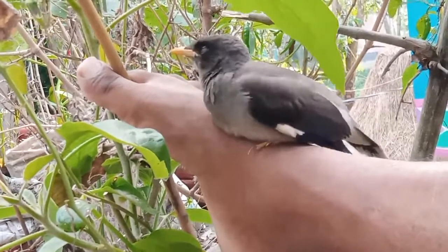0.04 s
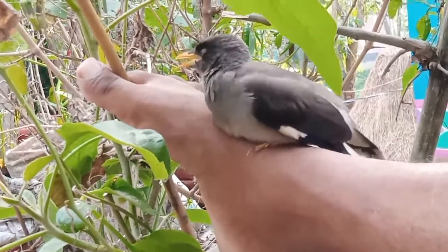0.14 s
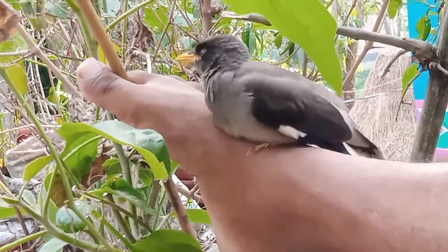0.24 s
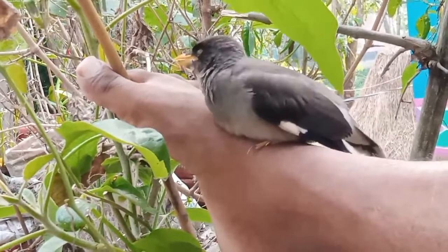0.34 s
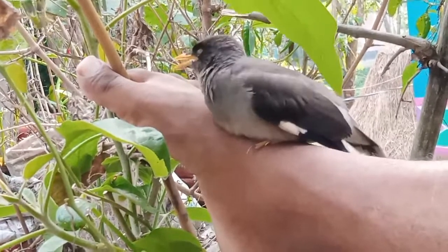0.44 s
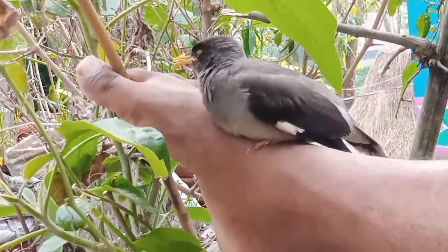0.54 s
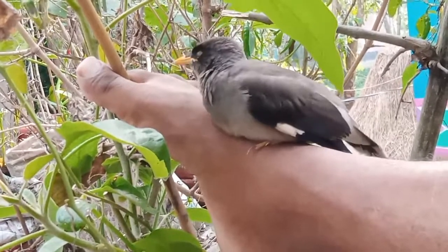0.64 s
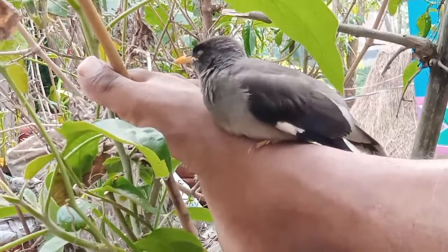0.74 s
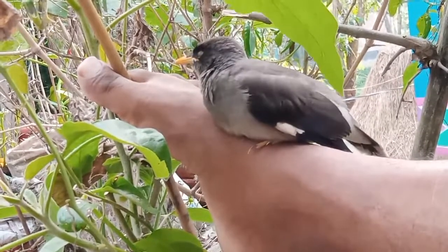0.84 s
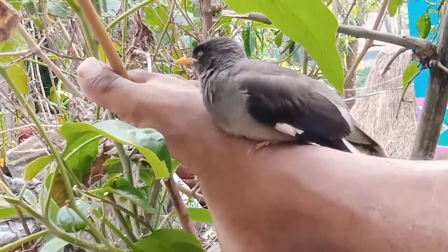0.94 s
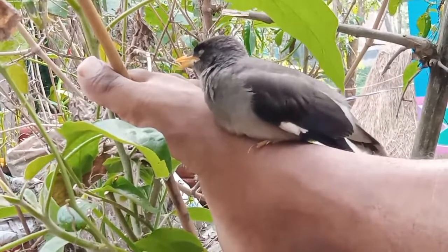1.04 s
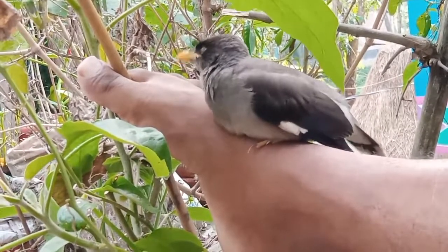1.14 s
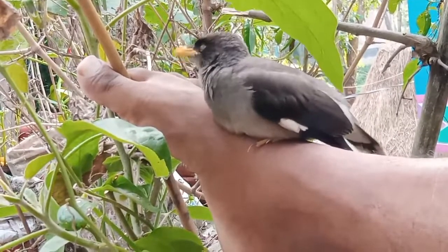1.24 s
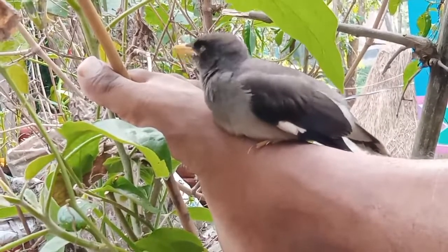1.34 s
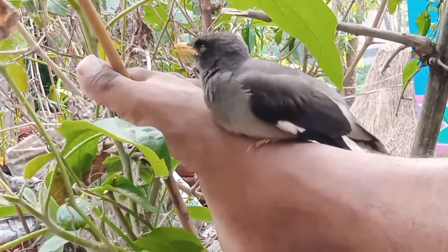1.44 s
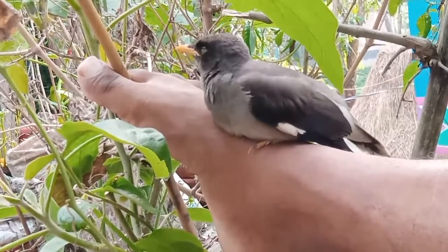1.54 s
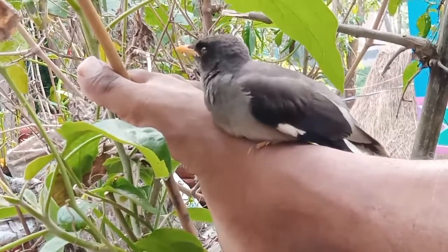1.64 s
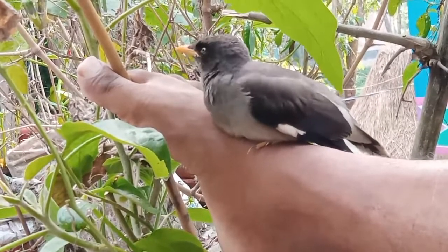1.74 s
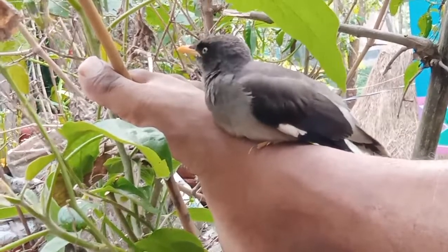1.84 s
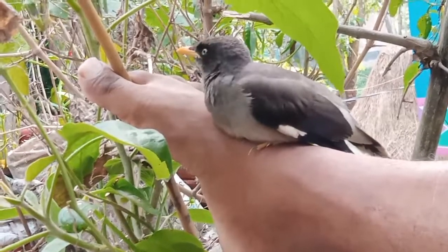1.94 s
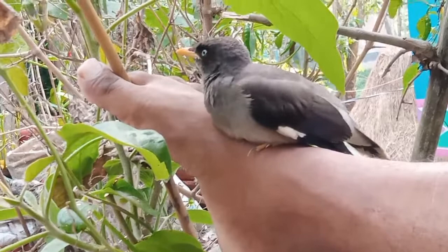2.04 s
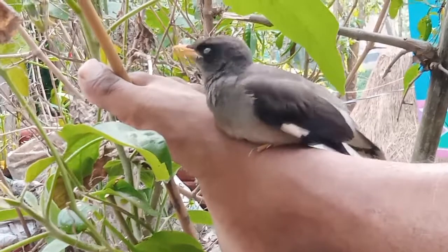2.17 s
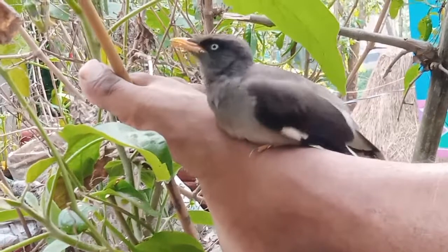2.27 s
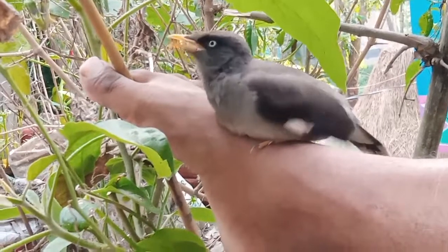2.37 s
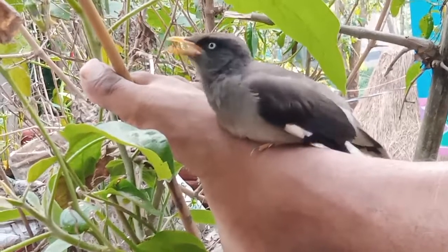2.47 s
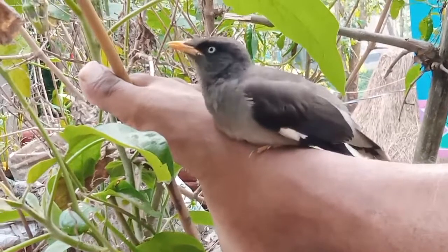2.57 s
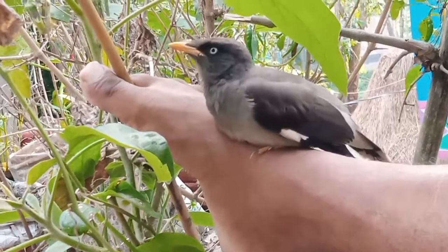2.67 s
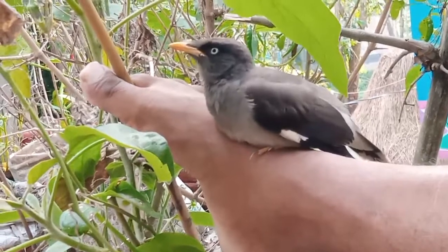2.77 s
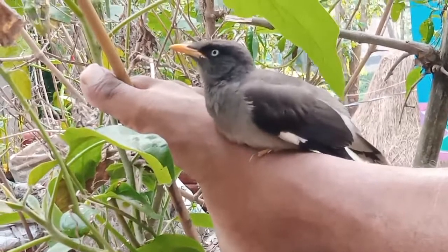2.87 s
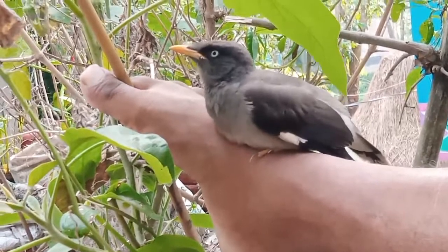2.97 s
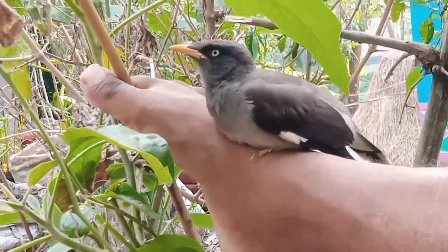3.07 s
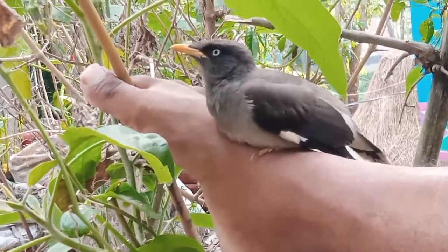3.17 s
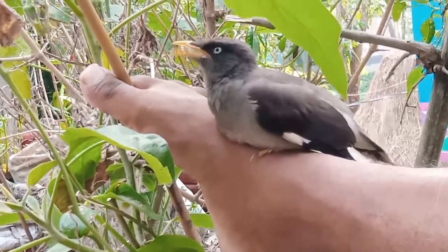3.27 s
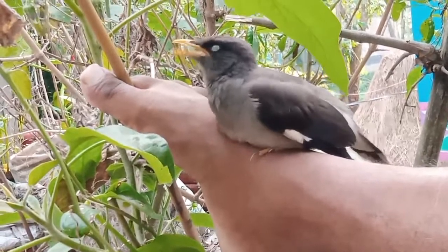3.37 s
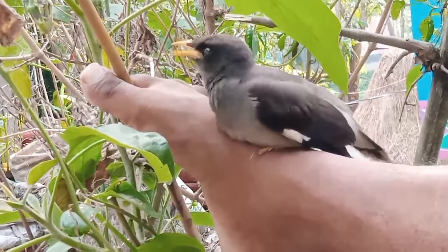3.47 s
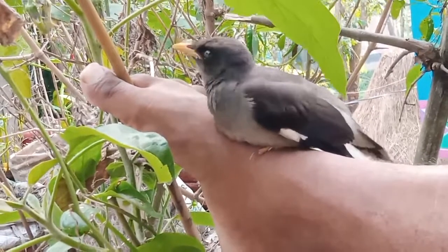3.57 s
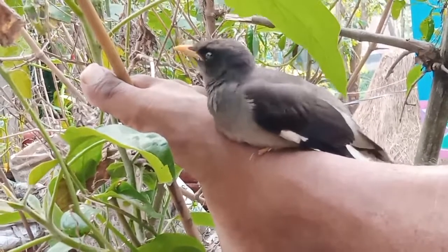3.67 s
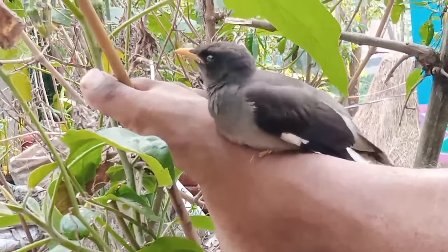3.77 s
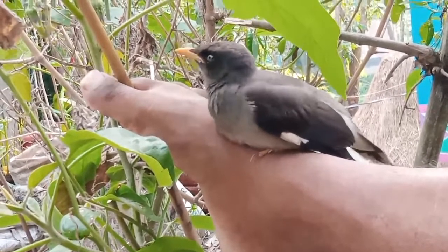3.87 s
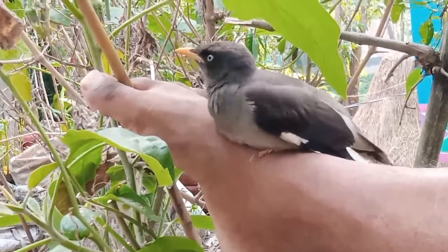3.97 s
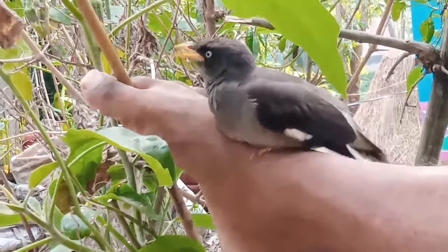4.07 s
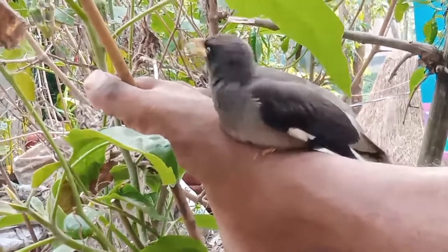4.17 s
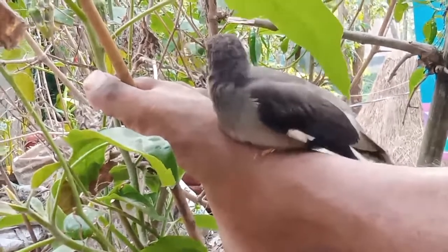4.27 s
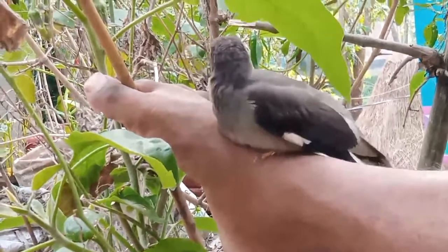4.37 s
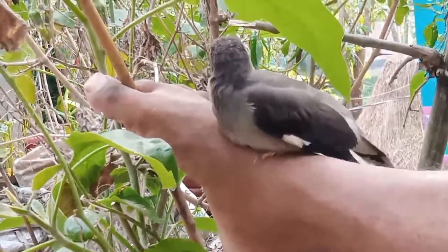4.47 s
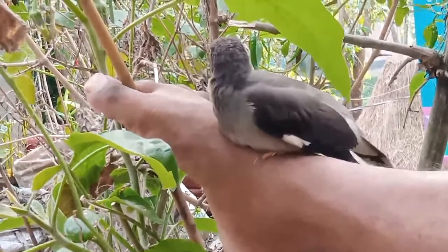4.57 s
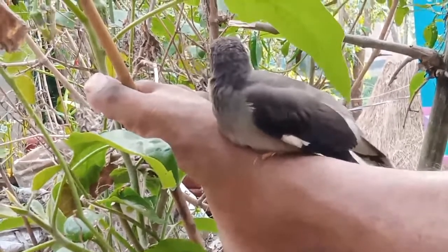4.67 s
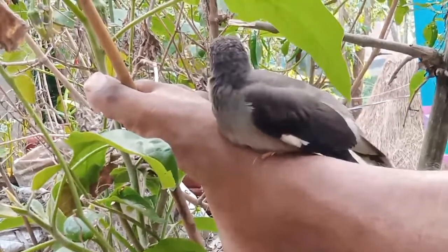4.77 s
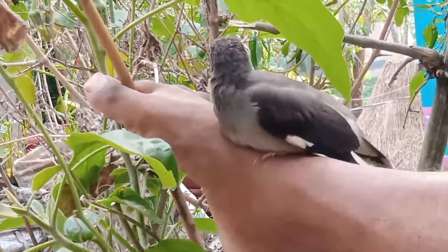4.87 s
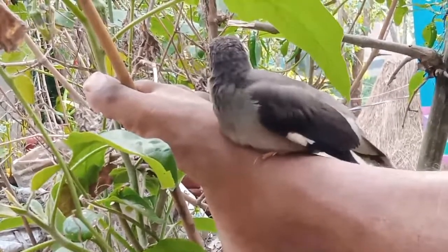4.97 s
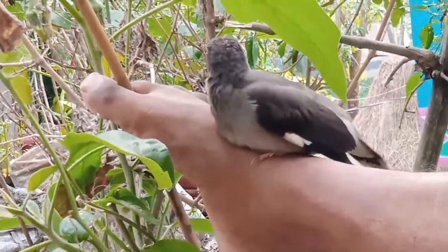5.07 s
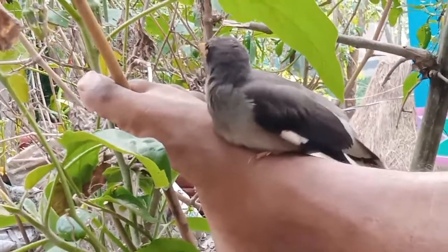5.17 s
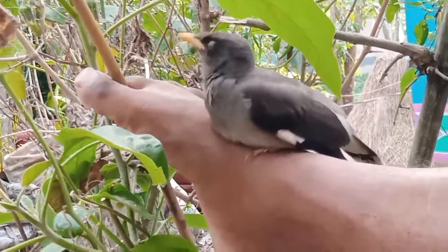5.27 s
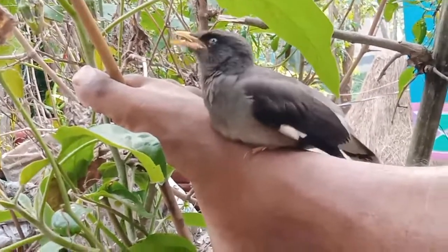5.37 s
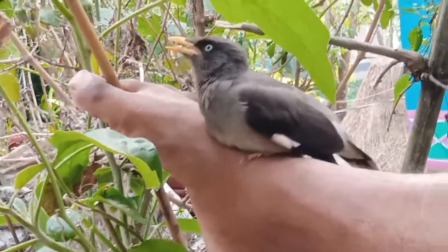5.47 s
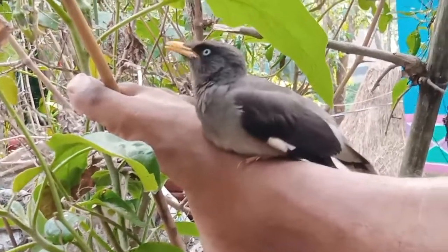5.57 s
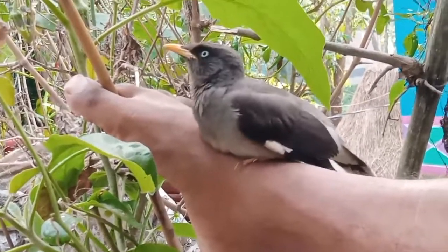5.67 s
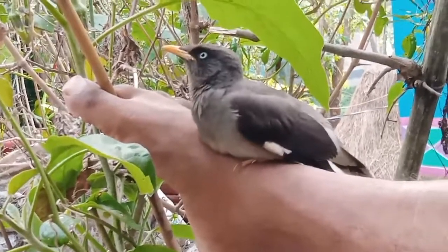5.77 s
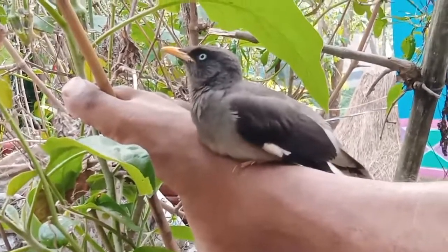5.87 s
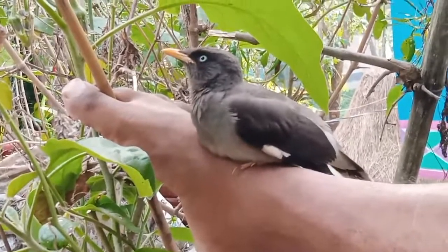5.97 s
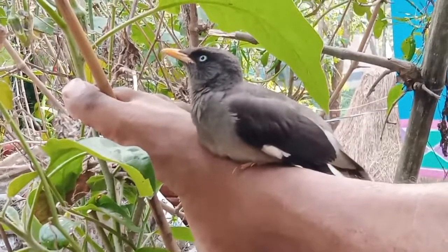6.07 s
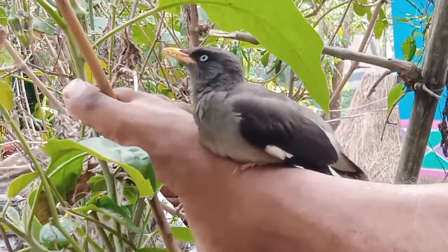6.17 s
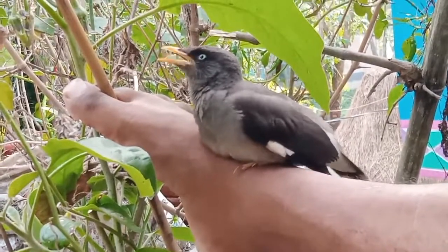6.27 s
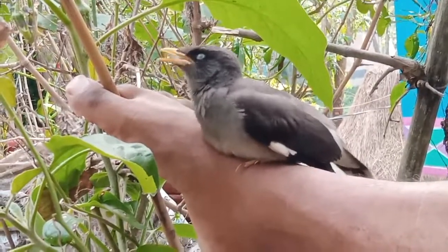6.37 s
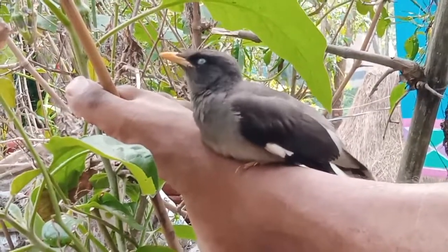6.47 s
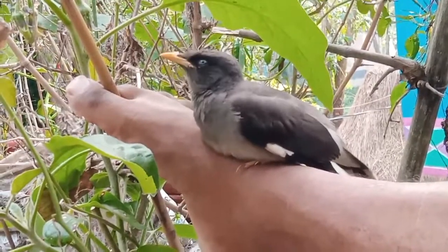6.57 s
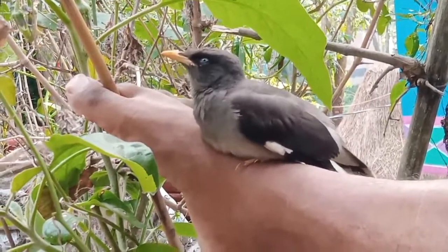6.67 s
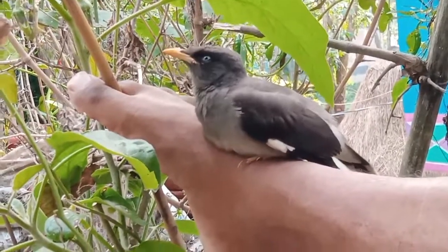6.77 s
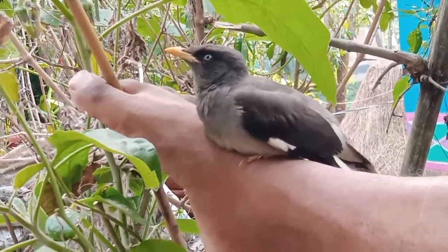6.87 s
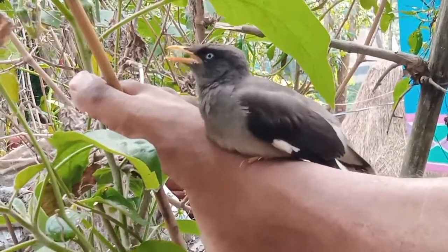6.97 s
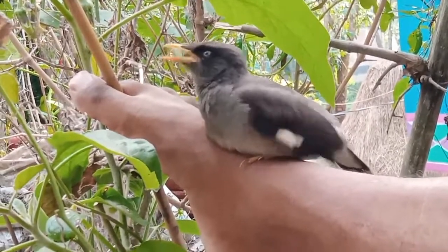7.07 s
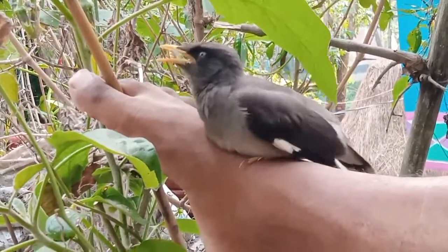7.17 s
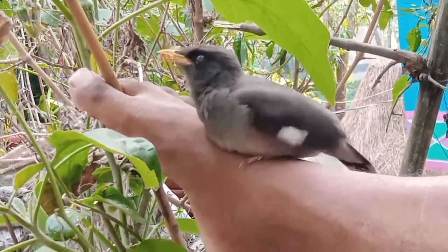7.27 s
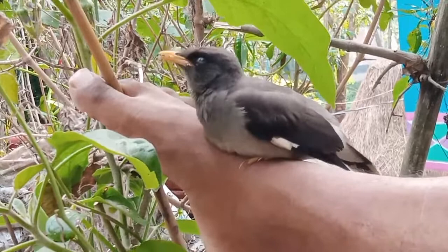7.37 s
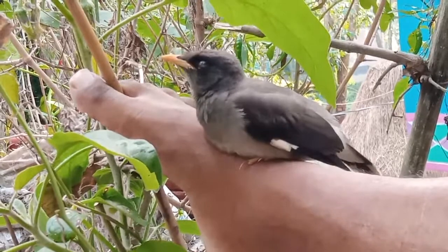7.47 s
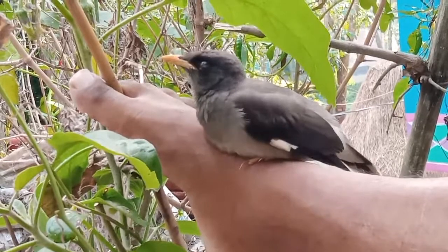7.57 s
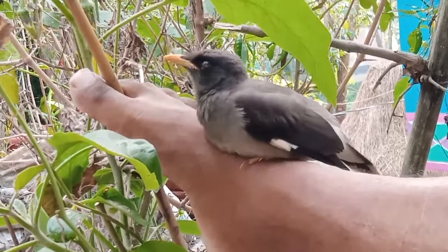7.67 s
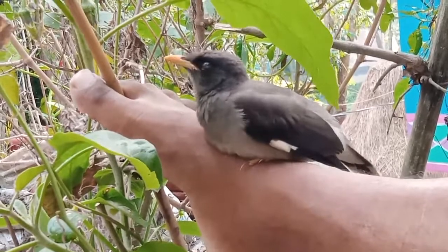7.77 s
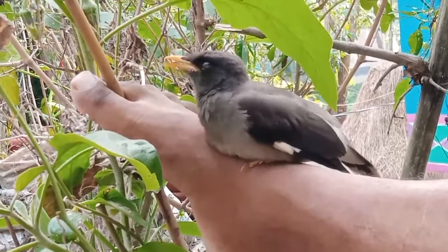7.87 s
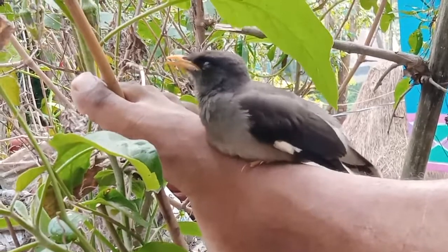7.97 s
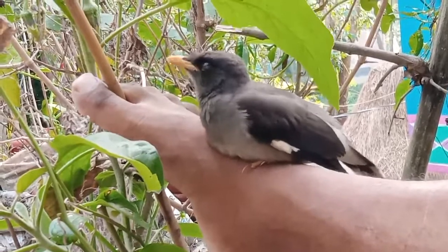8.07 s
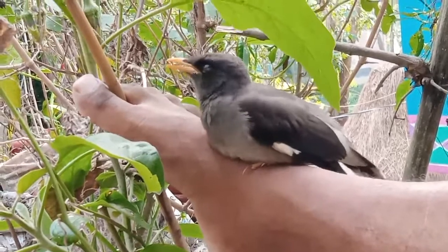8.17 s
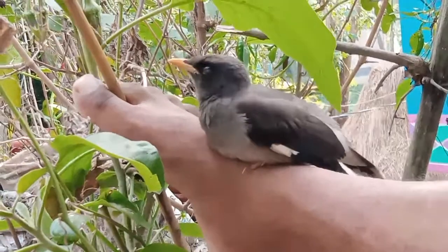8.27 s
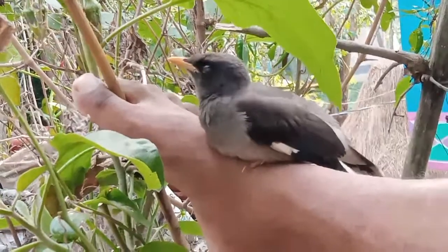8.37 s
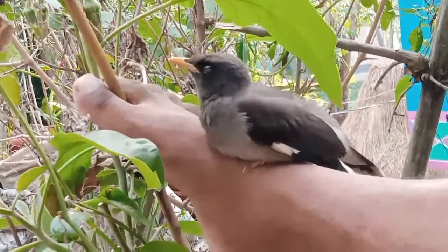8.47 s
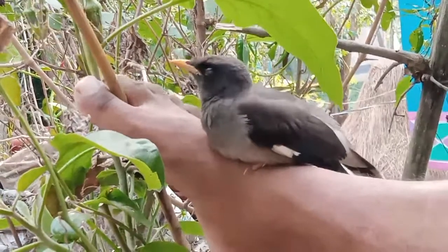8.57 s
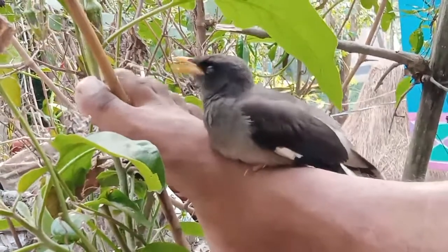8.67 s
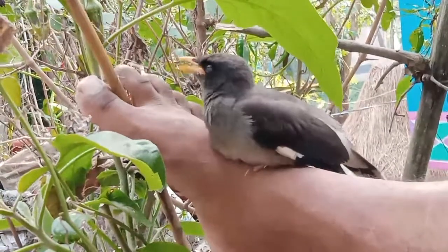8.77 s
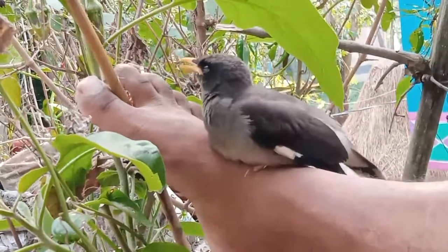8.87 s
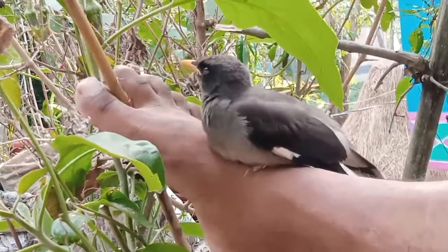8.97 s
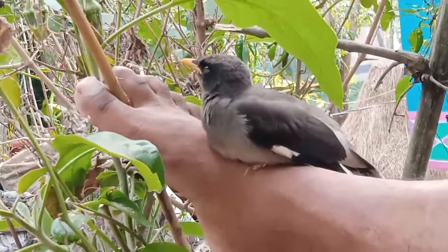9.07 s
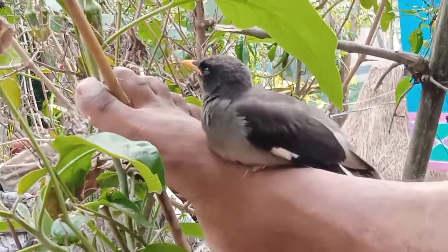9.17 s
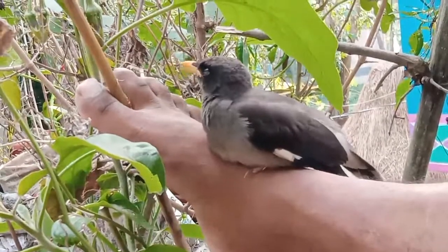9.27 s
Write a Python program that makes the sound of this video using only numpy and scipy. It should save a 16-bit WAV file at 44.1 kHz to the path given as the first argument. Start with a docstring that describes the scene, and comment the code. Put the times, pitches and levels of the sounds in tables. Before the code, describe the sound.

Outdoor garden, about 9.4 seconds, with a young myna very near the microphone. A faint, high, trembling distant horn sags and disappears by 0.9 s. The myna gives rapid bouts of short, raspy, scratchy begging calls, each under a tenth of a second, with a squeaky upward flip and breathy hiss; the first call of a bout usually ends higher and tighter. Bouts start near 0.3, 1.3, 2.3, 3.4, 4.3, 5.1 (the longest, six calls), 6.2, 7.0, 7.9, 8.6 and 9.2 s, the last cut short. Underneath, steady faint traffic hum and leaf rustle continue, with small leaf brushes, notably near 2 and 4 s. A far rooster crows softly at about 1.6, 4.3, 6.1, 7.5 and 8.1 s, blurred by echo. Small birds whistle thinly, most clearly around 2.4-4.3 and 7.4-8.5 s.

```python
"""A far horn dies away in the first second, over low traffic hum and rustling leaves that last throughout.
From 0.3 s a young myna on a hand, close by in a garden, begs in bouts of short raspy calls.
Small birds whistle and mid-band noise swells behind it; a far rooster crows from 1.6 s to 8.6 s.
Hum, leaves and swells are shaped noise; horn, whistles and crows are trembling partials, echoed.
The myna is two unsteady voices plus resonant noise; a bright noise band follows each call."""
import sys
import numpy as np
from scipy import signal
from scipy.fft import rfft, irfft, next_fast_len
from scipy.io import wavfile
from scipy.ndimage import uniform_filter1d, map_coordinates

SR = 44100
rng = np.random.default_rng(int(sys.argv[2]) if len(sys.argv) > 2 else 0)


def wav_record(signal):
    """Record a signal, one row per channel, as 16-bit PCM in the file named by sys.argv[1]."""
    frames = np.transpose(np.atleast_2d(signal))
    bounded = np.clip(frames, -1, 1)
    # unit amplitude maps onto the largest positive 16-bit level
    quanta = np.round(bounded * 32767).astype(np.int16)
    wavfile.write(sys.argv[1], SR, quanta)


N = 411453


def amp(db):
    """Gain of a level in dB."""
    return 10 ** (np.asarray(db) / 20)


def unit(x):
    """x scaled to rms 1."""
    return x / np.sqrt(np.mean(x ** 2) + 1e-20)


def along(points, hz):
    """Interpolates (frequency [Hz], value) points on a log axis."""
    f, v = np.transpose(points)
    return np.interp(np.log(hz + 1), np.log(f + 1), v)


def wobble(rate_hz, size=N):
    """A smooth random curve, rate_hz knots a second."""
    knots = rng.standard_normal(int(size * rate_hz / SR) + 4)
    return map_coordinates(knots, [np.arange(size) * rate_hz / SR])


def filtered(x, response):
    """x times a complex response of frequency."""
    m = next_fast_len(N + SR // 2)
    return irfft(rfft(x, m) * response(np.fft.rfftfreq(m, 1 / SR)), m)[:N]


def resonant(x, modes):
    """x through parallel resonances, each squared for deep valleys between them."""
    def response(f):
        return sum(amp(db) * (1j * f * width / (centre * centre - f * f + 1j * f * width)) ** 2
                   for centre, width, db in modes)
    return filtered(x, response)


def rush(spectrum, patchy_db):
    """Noise of rms 1 with patches of random gain in time and frequency."""
    z = signal.stft(rng.standard_normal(N), nperseg=512)[2]
    field = uniform_filter1d(rng.standard_normal(z.shape), 5, 0)
    field = uniform_filter1d(field, 12, 1)
    noise = signal.istft(z * amp(patchy_db * unit(field)), nperseg=512)[1][:N]
    return unit(filtered(noise, lambda hz: amp(along(spectrum, hz))))


def tone(hz, partials, jitter, flutter_db, rate_hz):
    """Partials (multiple, level [dB rms]) on a pitch curve, trembling in pitch and strength."""
    size = len(hz)
    phase = 2 * np.pi * np.cumsum(hz * (1 + jitter * wobble(rate_hz, size))) / SR
    total = 0
    for multiple, db in partials:
        gain = amp(db + flutter_db * wobble(rate_hz, size)) * np.sqrt(2)
        total = total + gain * np.sin(multiple * phase + rng.uniform(0, 2 * np.pi))
    return total


def add(track, rows, voice):
    """Plays rows (time [s], values) through voice, with 3.2 ms ends."""
    s, *cols = np.transpose(rows)
    n = np.arange(round(s[0] * SR), min(round(s[-1] * SR), N))
    ends = np.clip(np.minimum(n - n[0], n[-1] - n) / (0.0032 * SR), 0, 1)
    track[n] += ends * voice(*[np.interp(n / SR, s, c) for c in cols])


def swells(rows, edge):
    """Gain curve of soft-edged swells, each dying away by 8 dB, with a random flutter."""
    gain = np.zeros(N + SR)
    for s, length, db in rows:
        shape = signal.windows.tukey(round(length * SR), np.clip(edge, 0, 1))
        gain[round(s * SR):][:len(shape)] += amp(db - np.linspace(0, 8, len(shape))) * shape
    return gain[:N] * amp(1.5 * wobble(25))


# steady garden noise: (leaves [dB], hum [dB])
STEADY_DB = (-75.5, -62)
# hum spectrum: (frequency [Hz], relative density [dB])
HUM_SPECTRUM = [(25, -39), (76, -6.5), (96, -1.5), (125, -6), (170, -8), (206, 2.5), (260, -3), (400, -8.5),
                (662, -12.5), (866, -15.5), (1110, -15.5), (1270, -9), (1500, -18.5), (2500, -28),
                (3250, -26), (5500, -120)]
# swells of the hum: (start [s], length [s], initial level [dB])
HUM_SWELLS = [(6.3, 0.39, -61), (8.25, 0.33, -67.5)]


def traffic_hum():
    """Low-weighted noise, slowly wavering, with two swells."""
    gain = amp(STEADY_DB[1] + 0.54 * wobble(4.7)) + swells(HUM_SWELLS, edge=0.8)
    return gain * rush(HUM_SPECTRUM, patchy_db=3.0)


# leaf spectrum: (frequency [Hz], relative density [dB per Hz])
LEAF_SPECTRUM = [(1500, -20.5), (3000, -8), (4500, -0.5), (6000, -3.5), (7000, -4), (8000, -2), (9500, -7),
                 (12000, -11), (16000, -17.5)]
# leaves brushing: (start [s], length [s], initial level [dB])
LEAF_BRUSHES = [(.81, .18, -61.5), (1.97, .15, -59.5), (3.09, 0.217, -63.5), (3.88, 0.2, -65.5),
                (4.09, 0.17, -56.5), (6.18, 0.027, -57), (6.55, .35, -71.5), (7.5, .14, -74.5)]


def leaves():
    """Bright noise, slowly wavering, with short brushes."""
    gain = amp(STEADY_DB[0] + 1.5 * wobble(4.5)) + swells(LEAF_BRUSHES, edge=0.34)
    return gain * rush(LEAF_SPECTRUM, patchy_db=2.0)


# mid-band spectrum: (frequency [Hz], relative density [dB])
MID_SPECTRUM = [(1800, -54), (2700, -15.5), (3500, -4), (4800, -1.5), (5900, -2), (6500, -18),
                (9000, -41.5)]
# mid-band swells: (start [s], length [s], initial level [dB])
MID_SWELLS = [(0, .23, -59.5), (1.63, 0.17, -57.5), (2.66, 0.48, -72), (3.68, 0.33, -65.5),
              (4.54, .15, -56.5), (4.68, .26, -65.5), (5.68, 0.17, -62.5), (6.48, 0.22, -55),
              (6.7, .45, -57), (7.33, .09, -78), (7.98, 0.42, -60), (8.2, 0.39, -52.5)]


def mid_swells():
    """Soft-edged swells of mid-band noise."""
    return swells(MID_SWELLS, edge=0.62) * rush(MID_SPECTRUM, patchy_db=2.0)


# horn partials: (frequency [Hz], relative level [dB])
HORN_PARTIALS = [(2935, -22), (3345, 0), (3760, -22)]
HORN_DB, HORN_SAG_DB, HORN_FADES_DB = -43, 9, 41
HORN_ENDS_S, HORN_GONE_S = 0.39, 0.88


def horn():
    """Three trembling partials sag, then fade out."""
    track = np.zeros(N)
    end_db = HORN_DB - HORN_SAG_DB
    rows = [(0, HORN_DB), (HORN_ENDS_S, end_db), (HORN_GONE_S, end_db - HORN_FADES_DB)]

    def voice(db):
        partials = [(hz, db + d) for hz, d in HORN_PARTIALS]
        return tone(np.ones_like(db), partials, jitter=0.011, flutter_db=5.5, rate_hz=80)
    add(track, rows, voice)
    return track


SWELL_DB, FADE_DB = 13.5, 17.5


def note(start, length, loudest, settled, first_hz, last_hz, db):
    """Rows (time [s], pitch [Hz], level [dB]) of a note that glides, swells and fades."""
    share = np.linspace(0, 1, num=40)
    glide = np.clip(1 - share / np.clip(settled, .05, 1), 0, 1)
    hz = last_hz + (first_hz - last_hz) * glide
    level = np.interp(share, [0, np.clip(loudest, .05, .95), 1], [db - SWELL_DB, db, db - FADE_DB])
    return np.transpose([start + share * length, hz, level])


# crowing: (start [s], length [s], loudest at [share], glide over at [share], first pitch [Hz],
#   last pitch [Hz], second partial [relative dB], first and fourth partial [dB re second])
CROW_NOTES = [(1.64, 0.54, 0.59, 0.78, 655, 634, -78, 15.5, 8),
              (1.96, .5, 0.33, .9, 649.5, 687, -78, 14.5, 10.5),
              (4.28, 0.22, 0.34, .5, 605.6, 614, -52, -25, -27),
              (4.68, 0.46, .38, 0.92, 655.7, 622, -45, -36, -20.5),
              (6.07, 0.34, .2, .5, 624, 622, -59.5, -22, -32),
              (6.35, 0.35, 0.41, 0.67, 698, 646, -53, -21, -17),
              (7.501, .45, 0.25, 0.45, 604, 683.6, -55, -30, -18),
              (8.06, .27, 0.19, 0.43, 628, 621, -51, -29, -21),
              (8.319, 0.32, .45, 0.98, 659, 606, -46, -27, -28)]
# upper crow partials: (multiple, level [dB re fourth])
CROW_UPPER = [(6, -12), (7, -17), (8, -17), (9, -13)]


def rooster():
    """Far crowing: harmonic notes with trembling pitch and partials."""
    track = np.zeros(N)
    for *row, first_db, fourth_db in CROW_NOTES:
        partials = [(1, first_db), (2, 0.026), (4, fourth_db)]
        partials += [(k, fourth_db + d) for k, d in CROW_UPPER]
        add(track, note(*row), lambda hz, db: amp(db) * tone(
            hz, partials, jitter=0.011, flutter_db=5.5, rate_hz=44.6))
    return track


# whistled notes: (start [s], length [s], loudest at [share], glide over at [share],
#   first pitch [Hz / 0.97], last pitch [Hz / 0.97], relative level [dB])
WHISTLE_NOTES = [(.02, 0.037, 0.3, .4, 1850, 2274, -57), (1.0, 0.086, 0.4, .5, 825, 856, -61),
                 (2.92, .08, .5, 0.4, 810, 810, -66), (5.653, 0.1, 0.2, 0.64, 618, 632, -63.5),
                 (3.22, 0.06, 0.35, .5, 1940, 1780, -69), (2.38, 0.41, 0.67, .9, 3880, 3570, -59),
                 (2.71, 0.098, 0.17, .5, 4410, 3930, -58), (2.619, 0.21, .5, .9, 2960, 3930, -63.5),
                 (2.91, 0.088, 0.55, .3, 2660, 2850, -46.5), (3.069, 0.049, 0.56, .9, 1880, 2500, -61),
                 (3.568, 0.26, 0.35, .5, 4400, 4660, -56), (3.689, 0.095, 0.1, .5, 3770, 3620, -51),
                 (3.809, 0.22, 0.17, 0.21, 3655, 3952, -52.5), (3.911, 0.11, 0, .5, 3220, 3170, -60.5),
                 (4.038, 0.28, 0, .7, 5150, 4670, -57.5), (7.368, 0.28, 0.56, .3, 4410, 3986, -48),
                 (7.54, 0.14, 0.26, .5, 1934, 2000, -68), (7.672, 0.25, 0.1, .9, 5236, 4680, -48.5),
                 (7.957, .1, 0.4, .9, 2620, 2866, -47), (8.096, 0.15, 0.02, .8, 3494, 3850, -50),
                 (8.208, .22, 0.81, .4, 3850, 3335, -52), (8.406, 0.13, 0.28, .6, 3290, 3780, -53),
                 (8.369, .05, .5, .9, 2690, 2900, -50.5), (8.423, .13, .3, .5, 2730, 2620, -65),
                 (8.203, 0.21, 0.36, .5, 560, 613, -59.5), (9.247, 0.12, 0.23, .5, 4285, 4370, -53)]


def small_birds():
    """Whistles: single gliding partials, trembling in pitch and strength."""
    track = np.zeros(N)
    for row in WHISTLE_NOTES:
        add(track, note(*row), lambda hz, db: tone(
            hz, [(0.97, db)], jitter=0.0051, flutter_db=5.0, rate_hz=160))
    return track


# yard decay: (frequency [Hz], t60 [s])
YARD_T60 = [(1000, 0.13), (3000, 0.23), (6000, 0.28), (12000, 0.1)]


def echo(x):
    """Walls and foliage answer 200 samples late; each frequency dies at its own speed."""
    hz, t, z = signal.stft(rng.standard_normal(SR // 2), SR, nperseg=256)
    decay = amp(-60 * t / along(YARD_T60, hz)[:, None])
    tail = signal.istft(z * decay, SR, nperseg=256)[1]
    return signal.fftconvolve(np.pad(x, (200, 0)), tail / np.linalg.norm(tail))[:N]


# bright band spectrum: (frequency [Hz], relative density [dB per Hz])
BRIGHT_SPECTRUM = [(11500, -42), (12100, -2), (15200, -4.5), (15700, -4.5)]


def bright_band(gain):
    """Bright noise band at 12-16 kHz that follows each call."""
    return gain * rush(BRIGHT_SPECTRUM, patchy_db=6.5)


# resonances: (centre [Hz], width [Hz], relative level [dB])
THROAT_MODES = [(2034, 690, -0.5), (2810, 1720, 5)]
GAPE_MODES = [(4024, 1030, 0)]
BEAK_MODES = [(5690, 1200, 3), (6980, 304, -6), (8360, 230, -8)]


def breath(throat, gape, beak):
    """Turbulent air, gated by three gain curves, excites throat, gape and beak resonances."""
    air = rush([(1000, 0)], patchy_db=4.0) * amp(1.2 * wobble(600))

    def band(hz):  # 1.1-11.5 kHz, falling 3 dB per octave
        return (hz > 1100) * (hz < 11500) * amp(-3 * np.log2(hz / 4000 + 1e-3))
    broad = filtered(air[::-1], band)
    hiss = unit(resonant(air, BEAK_MODES)) + amp(-19.0) * unit(broad)
    rasp = throat * unit(resonant(air, THROAT_MODES)) + gape * unit(resonant(air, GAPE_MODES))
    return rasp + beak * hiss


# first voice up to the flip: (nominal time from flip [ms], share of low note's pitch, relative level [dB])
TO_FLIP = [(-21, 0.67, -18.5), (-18.5, .97, -3.5), (-13.5, 1.05, 0.5), (-11.5, 1, -5.5), (-5.5, .86, -9),
           (-3, .84, -7.5)]
# first voice after it: (nominal time from flip [ms], way from last note up to flip's top [0-1]
#   before steepening, relative level [dB])
FROM_FLIP = [(0, 1, -7.5), (4.2, 0.85, -23.5), (7.4, 0.58, 2.5), (10.2, 0.26, -4), (14.4, .08, -6.5),
             (25, .03, -10.5), (30, 0.06, -32)]
FLIP_HZ = 3196
STEEPER_WHEN_TIGHT = 1.5  # a tight syrinx drops to its last note faster


def first_voice_path(last_hz, low_db, last_db, tight):
    """Rows (time [ms], pitch [Hz], level [dB]): low note, upward flip, fall to the last note."""
    low_hz = 1870 + 170 * tight
    steepness = 1 + STEEPER_WHEN_TIGHT * tight
    path = [(t, share * low_hz, low_db + db) for t, share, db in TO_FLIP]
    path += [(t, last_hz + way ** steepness * (FLIP_HZ - last_hz), last_db + db)
             for t, way, db in FROM_FLIP]
    return [(-27.0, path[0][1], -93.0)] + path + [(45.9, path[-1][1], -94.0)]


# begging calls: (upward flip at [s], last note [Hz], voice, second voice, breath [relative dB])
CALLS = [(0.307, 2580, -30, -30.5, -41), (0.403, 2120, -30, -32, -36), (0.501, 2043, -29.5, -28.5, -38.5),
         (0.611, 1914, -29, -31, -43.5), (1.272, 2613, -30.5, -52, -42), (1.366, 2126, -31, -31, -38.5),
         (1.468, 2030, -31, -28, -35.5), (1.593, 2110, -33.5, -34.5, -41.5), (2.308, 2610, -34, -54, -39.5),
         (2.397, 2310, -33.5, -46, -37), (2.496, 2103, -31.5, -43, -35.5), (2.609, 2050, -31.5, -31.5, -41),
         (3.433, 2622, -31.5, -52, -35), (3.528, 2240, -31, -39, -34.5), (3.634, 2024, -30, -34, -37),
         (4.283, 2750, -35, -60, -39.5), (4.378, 2164, -32, -39, -37), (4.491, 2098, -31.5, -33.5, -38.5),
         (5.06, 2655, -32.5, -37.5, -39.5), (5.167, 2166, -31.5, -33.5, -39.5),
         (5.28, 1882, -31.5, -35, -42), (5.394, 2023, -32.5, -33.5, -40), (5.507, 1940, -31, -33, -39.5),
         (5.626, 1973, -30.5, -31, -40), (6.239, 2556, -32.5, -43, -36.5), (6.332, 2245, -30.5, -35, -35.5),
         (6.446, 2054, -31.5, -34, -38.5), (6.979, 2545, -35, -40.5, -37.5),
         (7.078, 2273, -32.5, -36, -35.5), (7.176, 1965, -31, -31.5, -33.5),
         (7.279, 1906, -30.5, -28.5, -36.5), (7.852, 2633, -32.5, -37, -37.5),
         (7.958, 2187, -33.5, -35, -37), (8.088, 2074, -33.5, -34, -39.5), (8.579, 2785, -35, -42, -37.5),
         (8.683, 2218, -32.5, -35, -35.5), (8.797, 2037, -32.5, -32, -39), (9.249, 2567, -34.5, -34.5, -38),
         (9.348, 2194, -31.5, -41, -41.5)]
# second voice: (nominal time from flip [ms], pitch [Hz / 0.93], relative level [dB])
SECOND_VOICE = [(-32.5, 2090, -11.5), (-19.5, 2900, -9), (-13, 3350, -11.5), (-3, 3600, -1.5),
                (3.5, 3000, -4.5), (15, 3500, -3), (27, 3700, -18)]
# hoarse start: (nominal time from flip [ms], pitch [Hz / 0.93], level [dB re low note])
HOARSE_START = [(-44, 2000, -27.5), (-38.5, 2000, -13.5), (-30, 2250, -9), (-22.5, 2400, -9),
                (-15, 2400, -23)]
# overtones of the first voice: (multiple, relative level [dB])
VOICE_OVERTONES = [(2, -8.5), (3, -6)]
SLACK_HZ, TIGHT_HZ = 1950, 2700  # last note of a slack and of a tight syrinx
# parts re voice or breath: (level when slack [dB], change when tight [dB])
LOW_NOTE_DB, LAST_NOTE_DB = (-0.79, -1.16), (0.92, 0.6)
GAPE_RASP_DB, BEAK_HISS_DB, BRIGHT_BAND_DB = (4.1, -3), (3.06, 1.4), (-8, -13.5)


def myna():
    """Two unsteady syrinx voices over turbulent air, with the bright band that follows each call."""
    voices, throat, gape, beak, bright = np.zeros((5, N + SR))
    span = np.arange(-2400, 2400)
    for s, last_hz, voice_db, second_db, breath_db in CALLS:
        # a tighter syrinx: higher notes, a shorter call
        tight = (last_hz - SLACK_HZ) / (TIGHT_HZ - SLACK_HZ)
        low_db, last_db = [voice_db + db + more * tight for db, more in (LOW_NOTE_DB, LAST_NOTE_DB)]
        gape_db, hiss_db, bright_db = [breath_db + db + more * tight
                                       for db, more in (GAPE_RASP_DB, BEAK_HISS_DB, BRIGHT_BAND_DB)]
        # no two calls run equally fast
        ms = span / SR * 1000 * (1 + 0.0481 * rng.standard_normal())
        at = round(s * SR) + span

        def follow(rows):
            t, hz, db = np.transpose(rows)
            return np.interp(ms, t, hz), np.interp(ms, t, db)

        hz, db = follow(first_voice_path(last_hz, low_db, last_db, tight))
        db = db + 3 - 9 * tight * np.clip((ms - 14) / 12, 0, None)
        voices[at] += tone(hz, [(1, db)], jitter=0.016, flutter_db=1.0, rate_hz=420)

        # overtones lose 9 dB per kHz above 6.5 kHz
        overtones = [(k, db + d + breath_db - low_db - 9 * np.clip(k * hz / 1000 - 6.5, 0, None))
                     for k, d in VOICE_OVERTONES]
        voices[at] += tone(hz, overtones, jitter=0.03, flutter_db=2.0, rate_hz=460)

        for rows, level_db, shake in (SECOND_VOICE, second_db, .05), (HOARSE_START, low_db, .1):
            fade_in = (rows[0][0] - 6, rows[0][1], -60)
            fade_out = (rows[-1][0] + 6, rows[-1][1], -60)
            hz, db = follow([fade_in] + rows + [fade_out])
            voices[at] += tone(hz, [(0.93, db + level_db)], jitter=shake, flutter_db=4.5, rate_hz=800)

        def puff(centre_ms, width_ms):
            return -20 * np.abs((ms - centre_ms + 4 * tight) / width_ms) ** 2.0
        throat[at] += amp(low_db - 3.5 + puff(-5.0, 32.4))
        gape[at] += amp(gape_db + puff(16.2, 25.6))  # opens after the flip
        beak[at] += amp(hiss_db + puff(4.1, 30.0))
        bright[at] += amp(bright_db + puff(5, 33))
    return voices[:N] + breath(throat[:N], gape[:N], beak[:N]) + bright_band(bright[:N])


def scene():
    """Close myna, far tones heard mostly through echoes, and the garden noise."""
    garden = traffic_hum() + leaves() + mid_swells()
    far = horn() + rooster() + small_birds()
    bird = myna()
    echoes = echo(amp(-19) * bird + amp(1.5) * far)
    return (bird + amp(-5.0) * far + echoes + garden)[None]


# tone of the whole sound: (frequency [Hz], gain [dB])
OVERALL_TONE = [(9000, -0.5), (10000, -14), (11700, -12.5), (12200, 3), (15300, -0.5), (15700, 12)]
TOP_HZ = 15830


def record(dry):
    """The whole sound dips near 11 kHz, is brighter from 12 kHz, stops at 15.83 kHz."""
    return filtered(dry[0], lambda hz: amp(along(OVERALL_TONE, hz)) * (hz < TOP_HZ))[None]


dry = scene()
out = record(dry)
wav_record(out)
```